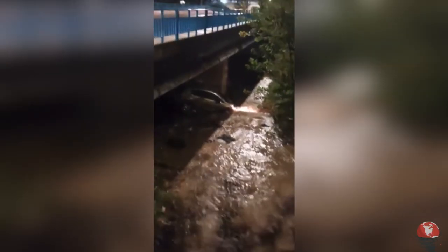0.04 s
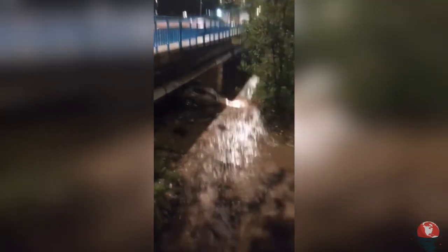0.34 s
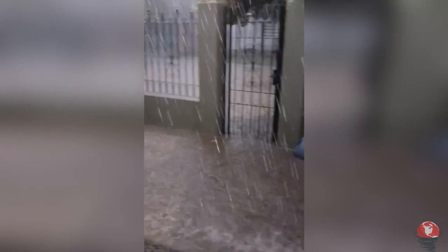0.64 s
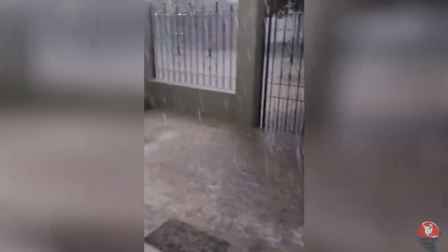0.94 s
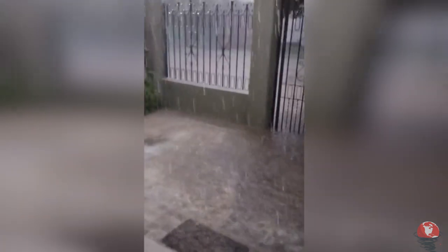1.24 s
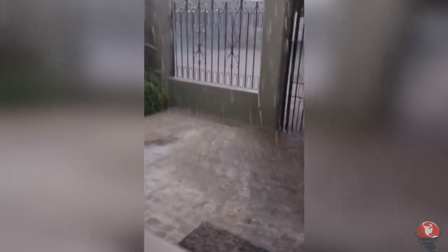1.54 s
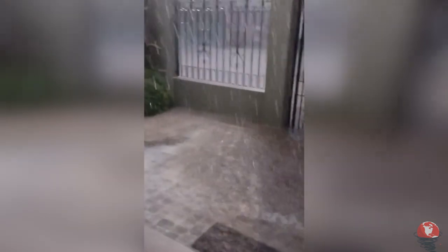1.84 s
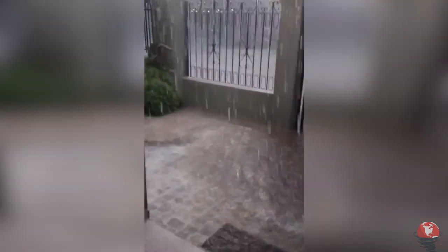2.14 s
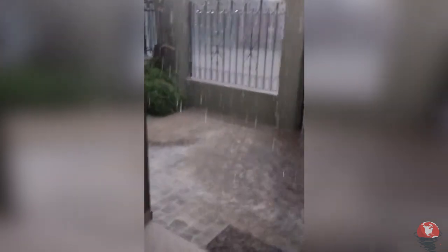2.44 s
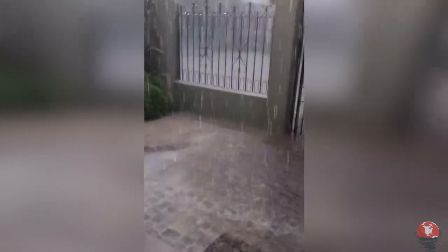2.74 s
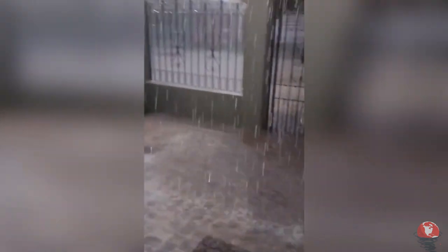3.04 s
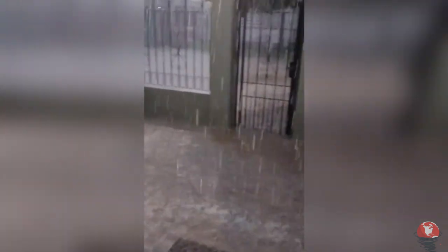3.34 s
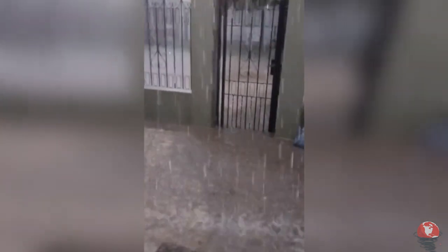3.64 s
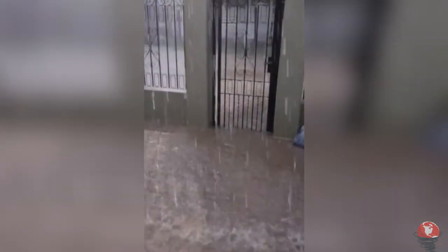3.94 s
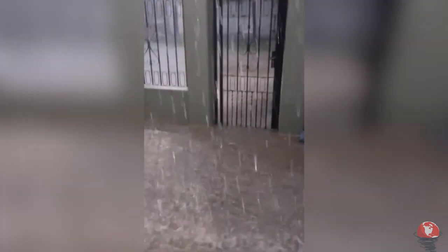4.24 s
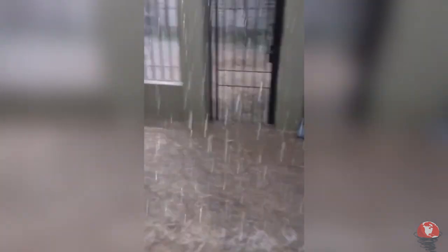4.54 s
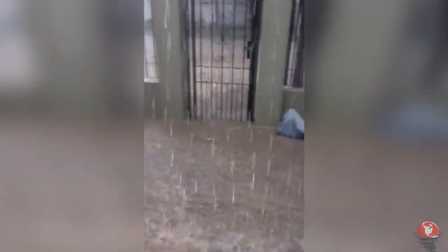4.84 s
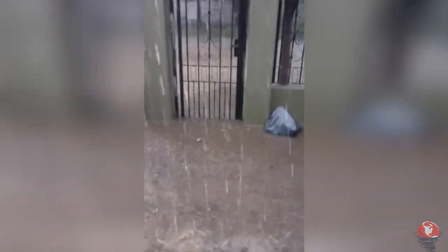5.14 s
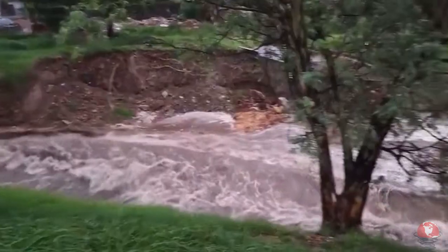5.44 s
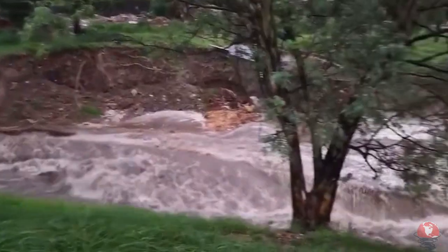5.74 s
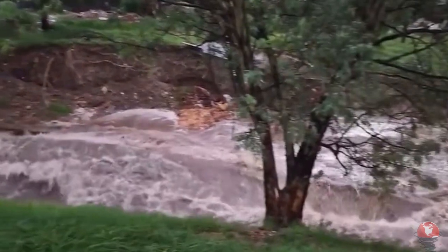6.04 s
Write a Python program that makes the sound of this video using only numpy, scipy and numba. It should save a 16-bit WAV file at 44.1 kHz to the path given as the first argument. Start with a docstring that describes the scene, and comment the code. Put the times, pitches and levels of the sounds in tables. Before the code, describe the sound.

Three outdoor water sounds follow one another, picked up in stereo by a handheld phone. First comes a moment of low, glugging river rush. After a tiny silent gap, heavy rain fills most of the time, a bright sizzle of drops and small ringing bubbles on standing water, with surging runoff, a little wind and a few dull microphone bumps. A sudden cut brings a final second of rumbling, foaming floodwater.

```python
"""A swollen river rumbles under a bridge for half a second. After a short silence the microphone stands in
a flooded yard: a downpour hisses, runoff gurgles, gusts and a hand nudge the microphone. Last, a muddy
torrent roars past a tree. At all three places the water is a haze of distant bubbles and drops, with
nearer ones ringing on top, picked up in stereo on a handheld phone."""
import sys
import numpy as np
from scipy import signal
from scipy.fft import rfft, irfft
from scipy.io import wavfile
from scipy.ndimage import uniform_filter1d
from numba import njit

SR = 44100
rng = np.random.default_rng(int(sys.argv[2]) if len(sys.argv) > 2 else 0)


def file_out(sig):
    """Save sig as 16-bit WAV at sys.argv[1]."""
    # one column per channel
    cols = np.atleast_2d(sig).T
    # limit, then scale
    lim = np.clip(cols, -1, 1)
    pcm = np.round(lim * 32767).astype(np.int16)
    wavfile.write(sys.argv[1], SR, pcm)


N = 277389
TIME = np.arange(N) / SR
FREQ = np.maximum(np.arange(N // 2 + 1) * SR / N, 1)
TOP_HZ = 15400  # upper limit of the microphone
AT_BRIDGE, IN_YARD, BY_TORRENT = (0.0, 0.535), (0.696, 5.477), (5.478, 6.4)  # start/s, end/s
BRIDGE_DB, RAIN_DB, WIND_DB = -24, -21, -40.5

# River at the bridge, spectrum: f/Hz, gain/dB
BRIDGE_SPECTRUM = [(25, -31), (55, -6), (80, -4), (122, 3), (170, -7.5), (265, 0), (380, -5), (500, -10.5),
                   (700, -8), (1400, -18), (2500, -21), (3400, -24.5), (4800, -24), (6800, -27),
                   (8700, -35.5), (10500, -30), (14000, -31), (15400, -36)]
# Its stereo width: f/Hz, side gain/dB
BRIDGE_SIDE = [(60, -14), (110, -18), (200, -11.5), (380, -9), (700, -5.5), (1290, 3.5), (2380, 2),
               (4400, 0.5), (7000, 1), (8700, -7), (11000, 0)]

# Wind on the microphone, spectrum: f/Hz, gain/dB
WIND_SPECTRUM = [(8, 0), (25, 4), (48, 3.5), (75, -9.5), (110, -5), (150, -13), (210, -16.5), (500, -21),
                 (2000, -70)]
# One gust arrives and weaker ones follow: t/s, level/dB re WIND_DB
WIND_GUSTS = [(0.88, -2), (0.92, 4), (1.03, 2.5), (1.15, 2.5), (1.36, -1), (1.55, -1), (1.68, 0.5),
              (2.2, -6.5), (2.6, -7), (2.8, -2), (3.15, -11.5), (3.43, -2), (3.65, -13), (4.15, -10),
              (4.45, -9), (4.7, -10), (5.3, -7)]
# Soft thumps on the microphone: t/s, level/dB, decay/s, push +1 or pull -1
MIC_THUMPS = [(0.897, -26, 0.063, -1), (0.925, -38, 0.01, -1), (1.001, -31, 0.013, -1),
              (1.071, -31, 0.0077, -1), (1.247, -36, 0.0086, -1), (2.347, -30, .009, 1),
              (2.369, -34, .008, -1), (2.378, -32, .008, 1)]
# The hand knocks on the phone: t/s, level/dB, f/Hz, decay/s
HAND_KNOCKS = [(0.899, -28, 85, .008), (0.899, -36, 330, 0.0039), (1.100, -32, 90, .007),
               (1.156, -33, 105, 0.013), (1.268, -29, 172, 0.0071), (2.394, -34, 163, 0.01)]

# Rain in the yard, spectrum: f/Hz, gain/dB
RAIN_SPECTRUM = [(40, -22), (110, -9), (170, -8), (240, -10.5), (400, -15.5), (650, -12.5), (900, -14),
                 (1400, -11.3), (2000, -11.5), (2800, -9.5), (3500, -10), (4900, -8.5), (7300, -4.8),
                 (8600, 1.8), (10500, -1.6), (12500, -8), (14500, -10.8), (15400, -13.3)]
# Its stereo width: f/Hz, side gain/dB
RAIN_SIDE = [(60, -18), (110, -30), (200, -15), (380, -7.5), (700, -4), (1290, 0.5), (2380, 0), (4400, 0),
             (6500, 1), (8400, -6), (11000, -1), (15000, -1.5)]
# Its balance: f/Hz, left minus right/dB
RAIN_PAN = [(60, 8), (110, 3), (200, -0.5), (380, 2.5), (700, 0), (1290, -0.8), (2900, 1), (4400, -0.3),
            (5400, -2), (8300, -3.5), (10500, 2), (15000, 0.5)]
# The rain dips briefly: t/s, depth/dB, length/s
RAIN_DIPS = [(0.74, 2.3, 0.09), (1.125, 1.5, 0.063), (1.307, 2, 0.066), (1.545, 1.8, 0.093),
             (2.52, 1.5, 0.12), (2.83, 0, 0.05), (3.213, 1, 0.034), (4.19, 0.1, 0.051), (4.57, 1, 0.07),
             (4.74, 1, 0.05), (5.03, 3, 0.076), (5.137, 3, 0.063)]
# The runoff surges, and fades as the microphone turns to the gate: t/s, gain/dB
RUNOFF_SURGES = [(0.72, -5), (1.2, -1), (1.4, 0.5), (1.72, 7), (2.0, 1), (2.52, -2), (2.7, 7), (2.87, -1),
                 (3.05, 5), (3.2, 0), (3.8, -0.5), (4.4, -3.5), (4.75, -6), (4.94, 1), (5.12, -5.5),
                 (5.45, -6.5)]
# Splashing in the mids: t/s, gain/dB
SPLASH_GAIN = [(0.7, 0.5), (2.3, 0.8), (3.2, 0), (4.5, 0.7), (5.3, 1.5)]
# The splashing wells up briefly: t/s, change/dB, length/s
SPLASH_SWELLS = [(0.89, 0.5, 0.052), (1.46, 1.8, 0.1), (2.39, 2, 0.053), (2.72, -0.5, 0.044)]
# Sizzle in the top treble: t/s, gain/dB
SIZZLE_GAIN = [(0.7, -3), (2.1, -3), (3.0, -2.3), (3.9, -2.3), (4.7, -3), (5.25, -2.4), (5.39, -2.5),
               (5.47, -4.5)]

# Torrent by the tree, spectrum: f/Hz, gain/dB
TORRENT_SPECTRUM = [(25, -24), (58, -2.5), (92, 3), (165, -5), (205, -5.5), (370, -12), (490, -17),
                    (710, -10.5), (1080, -16), (1700, -20.5), (2700, -19.5), (3550, -18.5), (4900, -21.5),
                    (7600, -19), (9200, -25.5), (11500, -21.5), (14000, -32)]
# Its stereo width: f/Hz, side gain/dB
TORRENT_SIDE = [(60, -14), (110, -19), (200, -17), (380, -9), (700, -6.5), (1290, 0), (2380, 1),
                (4400, 0.5), (8120, -6), (15000, -2)]
# Its balance: f/Hz, left minus right/dB
TORRENT_PAN = [(60, 1.5), (110, 3), (200, 2.5), (380, 1.5), (700, 1.5), (1290, 0.5), (2380, -1), (3600, -6),
               (5500, 0.5), (8500, -0.5), (11500, -8), (15000, -7)]
# Its flow: t/s, level/dB
TORRENT_LEVEL = [(5.5, -20.5), (5.9, -21), (6.29, -20.5)]
# The low rumble fades in, then swells briefly a few times: t/s, change/dB, length/s
RUMBLE_SWELLS = [(5.485, -11, 0.043), (5.53, 2, 0.025), (5.6, 2, 0.037), (5.715, 3, .04), (5.85, 4, 0.037),
                 (6.05, 5, 0.03), (6.275, 0, .05)]


def amp(db):
    """Decibels to gain."""
    return 10 ** (np.asarray(db) / 20)


def unit(x):
    """Scale to rms 1."""
    return x / np.sqrt(np.mean(x ** 2))


def curve(rows):
    """Join (t/s, level/dB) rows with straight lines, at every sample."""
    return np.interp(TIME, *np.transpose(rows))


def bumps(rows):
    """Brief rounded swells in dB, from (t/s, change/dB, length/s) rows."""
    return sum(db * np.exp(-(2 * (TIME - at) / length) ** 2) for at, db, length in rows)


def response(points):
    """Gain at every frequency, from (f/Hz, gain/dB) points."""
    hz, db = np.transpose(points)
    return amp(np.interp(np.log(FREQ), np.log(hz), db))


def below(x, hz):
    """Gentle low-pass without delay."""
    return irfft(rfft(x) / (1 + (FREQ / hz) ** 4), N)


def walk(rate):
    """Glide to a new random value `rate` times a second; rms 1."""
    hold = max(int(SR / rate), 1)
    steps = np.repeat(rng.standard_normal(N // hold + 2), hold)
    offset = rng.integers(hold)
    return unit(uniform_filter1d(steps[offset:offset + N], hold))


def ports(x, colour, width, left_lead):
    """Colour the water and spread it over two microphone ports; sound from the left arrives there first."""
    mid, side = rfft(x) * response(colour)
    lead = left_lead / (1 + (FREQ / 1600) ** 4)
    side = (1j * lead * mid + np.sqrt(1 - lead ** 2) * side) * response(width)
    return irfft(np.array([mid + side, mid - side]), N)


def shade(x, balance):
    """The phone's body shades each port differently."""
    tilt = np.sqrt(response(balance))
    return irfft(rfft(x) * np.array([tilt, 1 / tilt]), N)


def window(span, fade_s, tail_db=-90, tail_s=0.0066):
    """Fade one place in, then cut it off with a fade of a few milliseconds."""
    start, end = span
    fade_in = np.clip((TIME - start) / fade_s, 0, 1)
    fade_out = np.clip((end - TIME) / fade_s + .5, 0, 1)
    tail = amp(tail_db) * np.exp(-np.maximum(TIME - end, 0) / tail_s)
    return fade_in * np.maximum(fade_out, tail)


def haze():
    """Countless distant drops and bubbles merge into smooth noise, unrelated in two channels."""
    return unit(rng.standard_normal((2, N)))


@njit
def ring(starts, hz, cycles, sizes, rise):
    """Bubbles ring as damped sines that glide up as they fade, with their own size in each channel."""
    out = np.zeros((2, N))
    for k in range(len(starts)):
        length = int(cycles[k] * SR / hz[k]) + 2
        phase = 0.
        for i in range(min(length, N - starts[k])):
            age = i / length
            phase += 2 * np.pi * hz[k] / SR * (1 + rise * age)
            pressure = np.sin(phase) * np.exp(-5 * age)
            out[0, starts[k] + i] += sizes[k, 0] * pressure
            out[1, starts[k] + i] += sizes[k, 1] * pressure
    return out


def grains(rate, lo_hz, hi_hz, cycles, spread_db):
    """Drops (a cycle or two) or bubbles (many cycles) at random moments, bearings and distances."""
    when, pitch, life, distance, bearing = rng.random((int(rate * N / SR), 5)).T
    starts = (when * N).astype(np.int64)
    hz = np.interp(pitch, [0, 1], np.sqrt([lo_hz, hi_hz])) ** 2  # pitches thin out towards the top
    size = amp(-spread_db * np.log(np.maximum(distance, .01))) * hz ** .75
    direction = np.stack([np.cos(2 * np.pi * bearing), np.sin(2 * np.pi * bearing)], axis=1)
    return unit(ring(starts, hz, cycles * (.5 + life), size[:, None] * direction, rise=0.036))


def spatter(rate, decay_s, spread_db):
    """Heavy drops each throw up a burst of spray that starts at once and dies in milliseconds."""
    when, distance = rng.random((int(rate * N / SR), 2)).T
    power = amp(-spread_db * np.log(np.maximum(distance, .02))) ** 2
    hits = np.bincount((when * N).astype(int), power, minlength=N)
    spray_power = signal.lfilter([1], [1, -np.exp(-1 / (decay_s * SR))], hits)
    return unit(haze() * np.sqrt(spray_power))


def flicker(x, band, count, depth_db, rate):
    """Overlapping bands each waver alone; `band` places every frequency among the `count` bands."""
    band = np.clip(band, 0, count - 1)
    spectrum = rfft(x)
    bands = (irfft(spectrum * np.maximum(1 - abs(band - k), 0), N) for k in range(count))
    return sum(part * amp(depth_db * walk(rate)) for part in bands)


def churn(x, surge_db, surge_rate, flicker_db, flicker_rate):
    """All octaves surge together as water heaps up and breaks; each also flickers alone."""
    octave = np.log2(FREQ / TOP_HZ) + 9
    water = flicker(x, octave, count=10, depth_db=flicker_db, rate=flicker_rate)
    return water * amp(surge_db * walk(surge_rate))


def wind():
    """Light gusts flutter right on the microphone, at each port separately."""
    eddies = irfft(rfft(haze()) * response(WIND_SPECTRUM), N)
    flutter = amp(1.9 * walk(25))
    return unit(eddies * flutter) * amp(WIND_DB + curve(WIND_GUSTS))


def thumps(rise_s=0.00096):
    """Sudden pressure steps on the microphone hold briefly and leak away."""
    out = np.zeros(N)
    for start, db, decay, push in MIC_THUMPS:
        age = np.maximum(TIME - start, 0)
        out += push * amp(db) * (1 - np.exp(-age / rise_s)) * np.exp(-(age / decay) ** 2)
    return out


def knocks():
    """The hand shifts on the phone: dull knocks that die within a few cycles."""
    out = np.zeros(N)
    for start, db, hz, decay in HAND_KNOCKS:
        age = np.maximum(TIME - start, 0)
        out += amp(db) * np.sin(2 * np.pi * hz * age) * np.exp(-age / decay)
    return out


def bridge_river():
    """At the bridge, left of the microphone: bubble clouds rumble and big bubbles glug under the deck."""
    water = haze() + amp(-8) * grains(rate=3000, lo_hz=119, hi_hz=11950, cycles=13, spread_db=.5)
    glugs = grains(rate=160, lo_hz=195, hi_hz=340, cycles=14, spread_db=.6)
    water = churn(water + amp(-27) * glugs, surge_db=.2, surge_rate=14, flicker_db=.6, flicker_rate=18)
    return amp(BRIDGE_DB) * unit(ports(water, BRIDGE_SPECTRUM, BRIDGE_SIDE, left_lead=.93))


def torrent():
    """By the tree: water roars, foam fizzes; the low rumble fades in, then swells briefly a few times."""
    bubbles = grains(rate=4000, lo_hz=70, hi_hz=13000, cycles=10, spread_db=1.5)
    gulps = grains(rate=160, lo_hz=566, hi_hz=973, cycles=40, spread_db=-.5)
    foam = spatter(rate=200, decay_s=.004, spread_db=1.3)
    water = haze() + amp(-9.5) * bubbles + amp(-4) * foam + amp(-22) * gulps
    water = churn(water, surge_db=.2, surge_rate=12, flicker_db=.6, flicker_rate=16)
    water = unit(shade(ports(water, TORRENT_SPECTRUM, TORRENT_SIDE, left_lead=.25), TORRENT_PAN))
    rumble = below(water, 136)
    rumble_gain = amp(-2.2 + bumps(RUMBLE_SWELLS))
    return (water - rumble + rumble * rumble_gain) * amp(curve(TORRENT_LEVEL))


def yard_rain():
    """All round the microphone, drops slap the flooded yard and trap ringing bubbles; runoff gurgles."""
    ticks = grains(rate=14000, lo_hz=700, hi_hz=14000, cycles=2, spread_db=1.4)
    bubbles = grains(rate=4500, lo_hz=200, hi_hz=14000, cycles=18, spread_db=1.2)
    plinks = grains(rate=520, lo_hz=700, hi_hz=7000, cycles=200, spread_db=.9)
    fizz = grains(rate=900, lo_hz=7000, hi_hz=15000, cycles=260, spread_db=1.3)
    spray = below(spatter(rate=420, decay_s=.002, spread_db=.9), 6000)
    water = haze() + amp(-9.5) * (ticks + spray) + amp(-6.5) * bubbles + amp(-8) * plinks + amp(-7) * fizz
    water = churn(water, surge_db=.1, surge_rate=11, flicker_db=.35, flicker_rate=18)
    water = unit(shade(ports(water, RAIN_SPECTRUM, RAIN_SIDE, left_lead=0), RAIN_PAN))
    # the large bubbles of the runoff swell apart from the splashing and the fine sizzle above them
    runoff = below(water, 270)
    treble = water - below(water, 6900)
    splash = (water - runoff - treble) * amp(curve(SPLASH_GAIN) + bumps(SPLASH_SWELLS))
    strip = (TOP_HZ - FREQ) / 890  # treble bands 890 Hz apart
    sizzle = flicker(treble, strip, count=10, depth_db=2.3, rate=28) * amp(curve(SIZZLE_GAIN))
    gurgle_db = curve(RUNOFF_SURGES) + walk(11)
    swell_db = .6 * walk(28) - bumps(RAIN_DIPS)
    return amp(RAIN_DB) * (runoff * amp(gurgle_db) + (splash + sizzle) * amp(swell_db))


def scene():
    """Three microphone positions in turn: bridge, yard, torrent."""
    yard = yard_rain() + wind() + thumps() + knocks()
    return (bridge_river() * window(AT_BRIDGE, fade_s=0.00086, tail_db=-16)
            + yard * window(IN_YARD, fade_s=0.0067)
            + torrent() * window(BY_TORRENT, fade_s=0.0046))


def record(dry):
    """The phone cuts the treble steeply above TOP_HZ."""
    return signal.sosfilt(signal.ellip(10, .1, 80, TOP_HZ, fs=SR, output="sos"), dry)


dry = scene()
out = record(dry)
file_out(out)
```